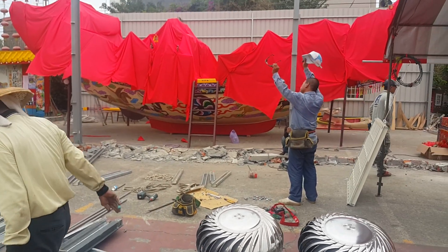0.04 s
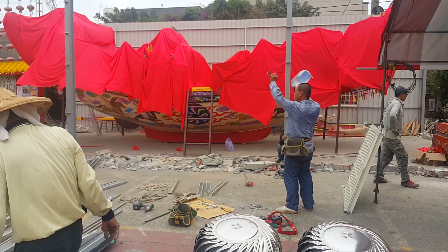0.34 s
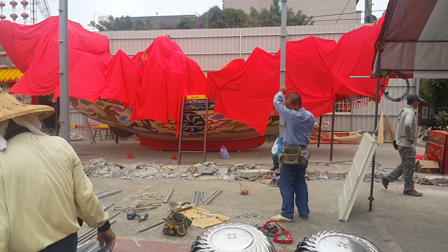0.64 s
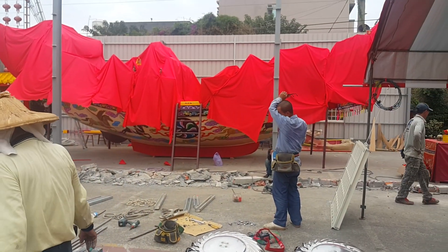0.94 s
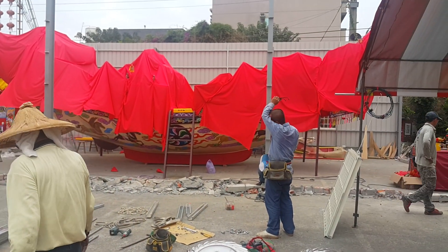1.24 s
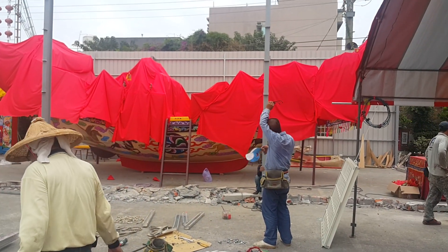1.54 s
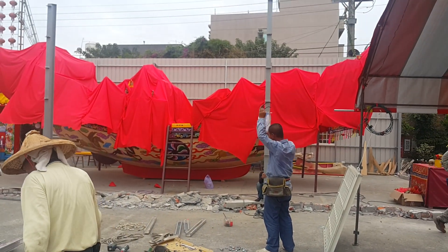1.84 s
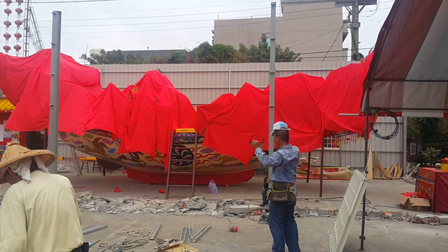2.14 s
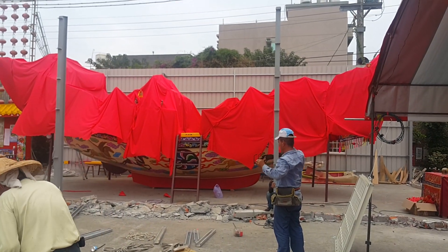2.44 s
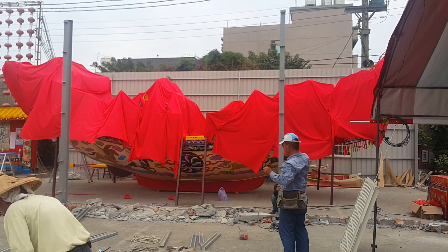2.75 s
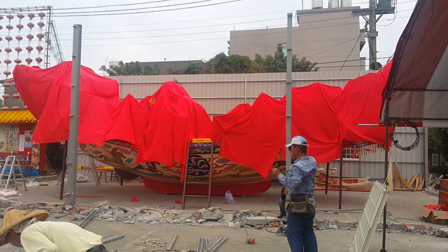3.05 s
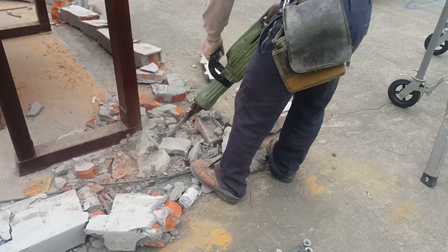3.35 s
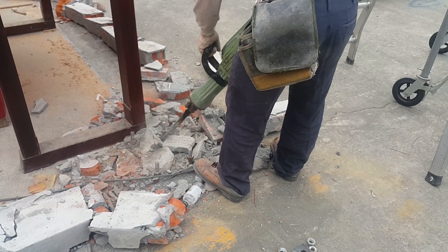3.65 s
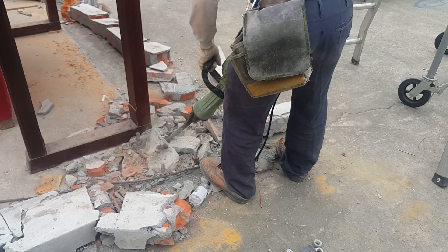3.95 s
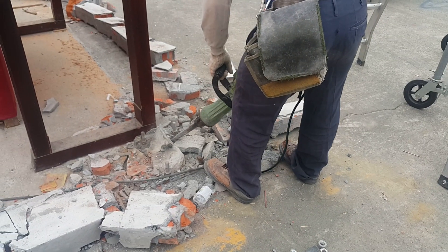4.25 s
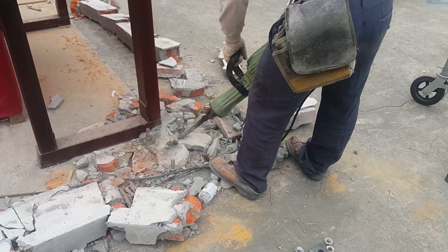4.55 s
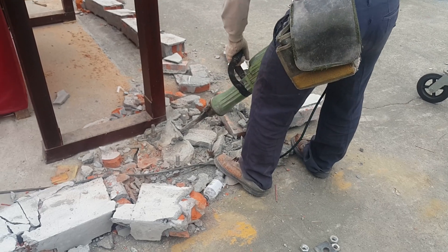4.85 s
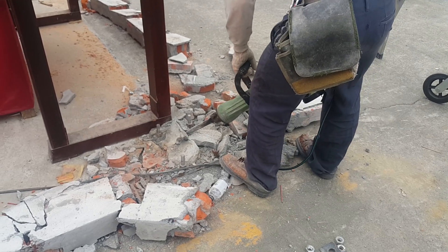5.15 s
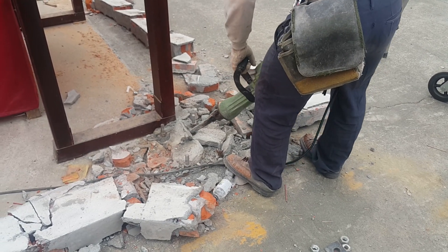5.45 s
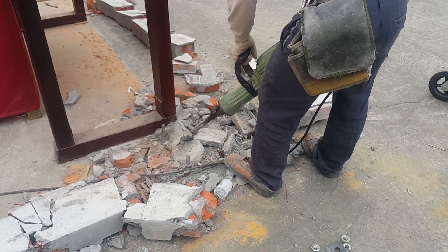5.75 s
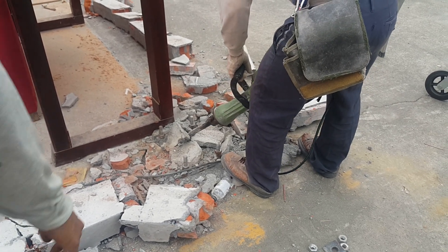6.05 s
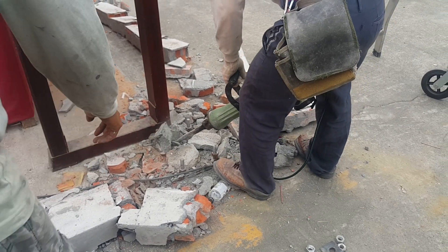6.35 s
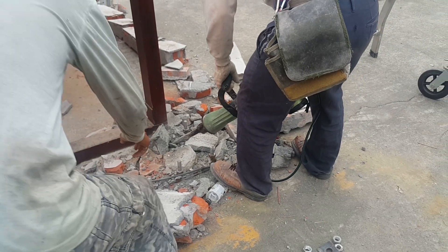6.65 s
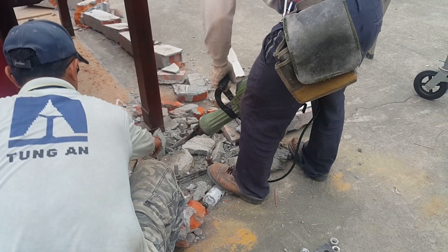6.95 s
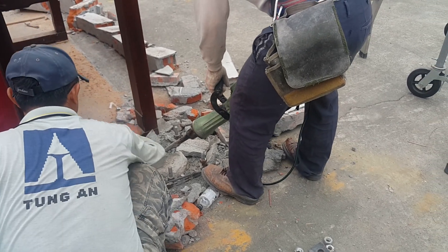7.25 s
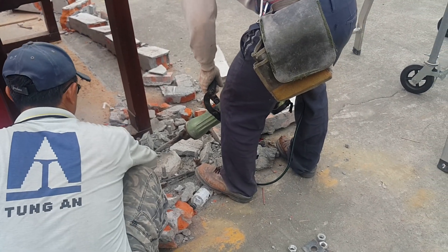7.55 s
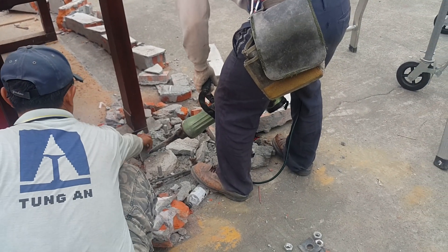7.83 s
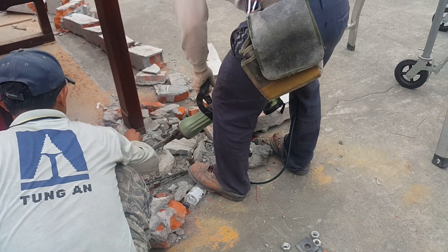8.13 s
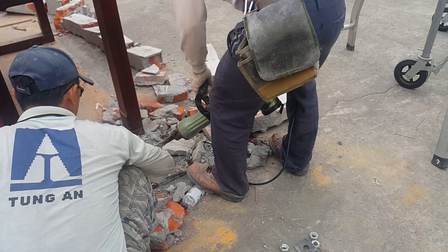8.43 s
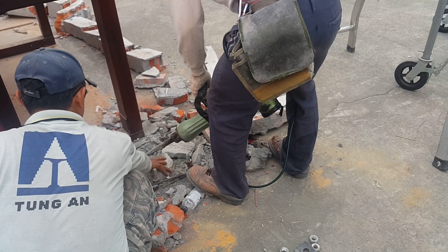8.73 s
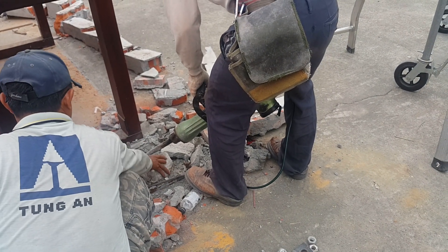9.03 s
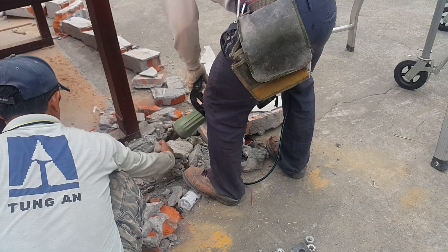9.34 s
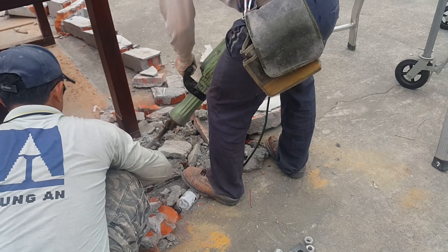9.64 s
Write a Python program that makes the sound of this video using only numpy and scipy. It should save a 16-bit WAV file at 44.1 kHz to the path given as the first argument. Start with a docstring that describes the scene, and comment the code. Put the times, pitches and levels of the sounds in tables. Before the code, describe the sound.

Heard first from across a walled yard, an electric hammer strikes masonry a few times, then rattles on rapidly. About a third of the way through, the microphone is right next to it. The motor whirrs up and coasts repeatedly, each blow cracking stone, ringing the chisel and scattering chips. Near the end the hammer winds down and a hand lightly shifts rubble, over quiet open air and a faint distant engine.

```python
"""Chipping hammer in a walled yard

An electric hammer breaks brick and concrete, heard from across the yard, then from beside it.
The trigger is feathered: the motor whirrs up, the blows quicken, then slow as it coasts.
Each blow cracks the stone and rings the steel chisel; close by it also thumps the ground and
throws chips. An engine idles far off. Near the end a hand shifts loose pieces."""
import sys
import numpy as np
from scipy import signal
from scipy.fft import rfft, irfft, next_fast_len
from scipy.io import wavfile

SR = 44100
rng = np.random.default_rng(int(sys.argv[2]) if len(sys.argv) > 2 else 0)


def store_wav(level_fs):
    """Save 16-bit WAV to argv[1]."""
    pcm = np.round(np.clip(np.atleast_2d(level_fs), -1, 1) * 32767)
    wavfile.write(sys.argv[1], SR, pcm.T.astype(np.int16))


N = 427329
TIME = np.arange(N) / SR
CHANGE_S = 3.343  # the scene changes from far to near
FAR = TIME < CHANGE_S
BLOW_SAMPLES = 8192
BLOW_TIME = np.arange(BLOW_SAMPLES) / SR


def from_db(db):
    """Decibels to gain."""
    return 10 ** (np.asarray(db) / 20)


def unit_rms(x):
    """Scale to an rms of 1."""
    return x / np.sqrt(np.mean(x ** 2) + 1e-20)


def at_hz(spectrum, hz):
    """Read a spectrum on a log-frequency axis."""
    freq_hz, level_db = np.transpose(spectrum)
    return np.interp(np.log(hz + 1), np.log(freq_hz), level_db)


def add(out, start_s, sound):
    """Mix a short sound in."""
    i = max(0, round(start_s * SR))
    out[:, i:i + sound.shape[-1]] += sound[..., :max(0, N - i)]


def colour(x, spectrum, tilt_db=0):
    """Minimum-phase filter; tilt raises the treble and lowers the middle."""
    size = next_fast_len(x.shape[-1] // 2 + 1) * 2
    hz = np.fft.rfftfreq(size, 1 / SR)
    level_db = at_hz(spectrum, hz) + tilt_db * at_hz([(1300, -1.03), (6000, 0.88)], hz)
    cepstrum = irfft(np.log(from_db(level_db)))[:size // 2]
    cepstrum[1:] *= 2
    return irfft(rfft(x, size) * np.exp(rfft(cepstrum, size)))[..., :x.shape[-1]]


def stereo_noise(shared, size):
    """White noise with a fraction of its power common to both ears."""
    noise = rng.standard_normal((3, size))
    return np.sqrt(shared) * noise[2] + np.sqrt(1 - shared) * noise[:2]


def drift(rate_hz):
    """Random wander, rms 1."""
    knots = rng.standard_normal(4000)
    return unit_rms(np.interp(TIME * rate_hz, np.arange(len(knots)), knots))


# open-air spectrum: freq_hz, level_db
AIR_SPECTRUM = [(25, -9.5), (60, -16), (150, 8.5), (400, 2.5), (650, 9), (1300, -5), (2300, -8),
                (5000, -15.5), (16000, -32)]

def air():
    """Low wash of open air, quieter beside the hammer."""
    level_db = np.where(FAR, -46, -52) + 0.12 * drift(3.1)
    return from_db(level_db) * unit_rms(colour(stereo_noise(0.93, N), AIR_SPECTRUM))


# engine harmonics: firing_multiple, far_level_db
ENGINE_HARMONICS = [(2, -62.5), (3, -63.5), (6, -62)]

def idling_engine(firing_hz=27):
    """Harmonics of a distant engine's wandering firing rate."""
    phase = 2 * np.pi * np.cumsum(firing_hz * (1 + 0.019 * drift(5.5))) / SR
    drone = sum(from_db(db + drift(14)) * np.sin(k * phase) for k, db in ENGINE_HARMONICS)
    return np.sqrt(2) * drone * from_db(np.where(FAR, 0, -10))


# trigger pulls: start_s, end_s, drive_noise_db
TRIGGER_PULLS = [(-0.6, 0.004, -26), (0.96, 1.55, -26), (1.544, 3.307, -30.5), (3.95, 4.386, -30),
                 (4.514, 4.765, -33), (5.24, 5.553, -33.5), (6.172, 6.56, -31.5), (6.815, 6.957, -29),
                 (7.638, 7.866, -31), (9.605, 9.7, -55)]

def motor_curves(spin_up_s=0.12, coast_s=0.6, switch_s=0.025):
    """Speed (dB re full) and whirr level (dB): the fan follows speed, brushes and gears the trigger."""
    t = np.arange(-SR, N, 100) / SR
    step_s = t[1] - t[0]
    drive = sum(from_db(db) * ((t >= on) & (t < off)) for on, off, db in TRIGGER_PULLS)
    speed = [1.0]
    for held in drive[1:] > 0:
        acceleration = (1 - speed[-1]) / spin_up_s if held else -speed[-1] / coast_s
        speed.append(speed[-1] + step_s * acceleration)
    speed_db = 20 * np.log10(speed)
    lag = np.exp(-step_s / switch_s)
    brushes = signal.lfilter([1 - lag], [1, -lag], drive)
    fan = from_db(-29 + 1.51 * speed_db)
    motor_db = 20 * np.log10(np.hypot(brushes, fan))
    return np.interp(TIME, t, speed_db), np.interp(TIME, t, motor_db)


def whirr(spectrum, motor_db, shared, flutter_db, grit_db):
    """Fan and brush noise with crank flutter and gear grit, duller as the motor slows."""
    roughness = from_db(flutter_db * drift(110) + grit_db * drift(400))
    full = unit_rms(colour(stereo_noise(shared, N) * roughness, spectrum))
    dull = signal.sosfiltfilt(signal.butter(2, 6000, fs=SR, output="sos"), full)
    brightness = np.clip(from_db(0.5 * (motor_db + 33.5)), 0, 1)
    return dull + brightness * (full - dull)


# far whirr spectrum: freq_hz, level_db
FAR_WHIRR_SPECTRUM = [(100, -18.5), (450, -10.5), (650, -3), (1150, -3), (1600, 1.5), (2350, -1),
                      (3100, -5.5), (4400, -4), (7300, -19), (8500, -25.5), (16000, -35)]

def far_motor(motor_db, din_db=-34.5):
    """Whirr from across the yard, sinking into the steady din of the site."""
    gain = np.hypot(from_db(motor_db - 0.8), from_db(din_db))
    return FAR * gain * whirr(FAR_WHIRR_SPECTRUM, motor_db, shared=0.62, flutter_db=1.5, grit_db=1.5)


# single blows, trigger feathered: start_s, crack_db, ring_db
SINGLE_BLOWS = [(0.0474, -17, -25.5), (0.1255, -18.5, -28.5), (0.221, -18.5, -29), (0.66, -25.5, -46),
                (0.773, -25, -43), (0.9467, -22.5, -42), (1.0264, -18.5, -31.5), (1.089, -17.5, -31),
                (3.3476, -15, -20), (3.438, -15.5, -25.5), (3.5466, -14, -26), (3.599, -29, -48),
                (3.6598, -31, -63), (3.9098, -27.5, -39.5), (3.9756, -23.5, -29.5), (4.054, -15.5, -27),
                (4.116, -18, -24.5), (4.1709, -14, -25.5), (4.2233, -16, -23.5), (4.2746, -16, -22.5),
                (4.3256, -12, -30.5), (4.3776, -15, -24.5), (4.435, -13.5, -28), (4.503, -14.5, -26),
                (4.5762, -12.5, -27), (4.641, -14, -22.5), (4.702, -12.5, -24.5), (4.7492, -13.5, -25.5),
                (4.8093, -16, -39), (4.8774, -15.5, -17.5), (4.902, -27.5, -21), (4.9467, -17.5, -48),
                (5.0287, -23.5, -24.5), (5.1169, -19, -28), (5.2249, -22, -28), (5.3071, -17.5, -25),
                (5.3682, -18, -21), (5.4231, -15.5, -23), (5.476, -13, -46), (5.5308, -14, -27.5),
                (5.597, -13.5, -27), (5.6723, -15, -35), (5.7583, -22, -50), (5.861, -25, -41),
                (5.9718, -31, -46), (6.0902, -21.5, -42), (6.21, -23, -31.5), (6.2969, -18.5, -24.5),
                (6.3592, -18.5, -20.5), (6.4138, -15.5, -21.5), (6.468, -16, -19), (6.5188, -15.5, -19.5),
                (6.5695, -15.5, -25), (6.6248, -15, -27.5), (6.6863, -18, -24.5), (6.759, -15.5, -28.5),
                (6.8368, -16.5, -34), (6.902, -16, -22), (6.957, -15, -21.5), (7.0149, -13, -31),
                (7.0848, -17, -48), (7.1549, -18.5, -22), (7.2355, -14.5, -22), (7.3343, -17.5, -24.5),
                (7.4533, -19.5, -31.5), (7.6, -19.5, -36), (7.7241, -18, -25), (7.794, -14.5, -30),
                (7.8597, -16, -20.5), (7.9322, -14, -21.5), (8.0237, -17.5, -24.5), (8.1268, -18, -25),
                (8.256, -20.5, -28.5), (8.4132, -23, -39), (8.6107, -26.5, -47), (8.8556, -27.5, -57),
                (9.1752, -30.5, -61), (9.674, -33, -65)]
# stretches of even blows, trigger held: start_s, blow_count, crack_db, ring_db
RUN_STRETCHES = [(1.142, 2, -18, -28), (1.2431, 4, -15, -28.5), (1.425, 6, -15, -28), (1.6881, 2, -16, -31),
                 (1.7916, 4, -16.5, -30), (1.979, 6, -17.2, -30.5), (2.248, 7, -18.5, -31.5),
                 (2.5522, 5, -20, -33.5), (2.7605, 2, -19, -39), (2.857, 3, -20, -41.5),
                 (3.0129, 3, -20, -41), (3.151, 4, -19.5, -39.5), (3.32, 1, -18, -39)]

def all_blows(crack_spread_db=0.7, ring_spread_db=2):
    """Every blow as a row of start_s, crack_db, ring_db."""
    start_s, count, crack_db, ring_db = np.transpose(RUN_STRETCHES)
    first_blow = np.cumsum(count) - count
    number = np.arange(first_blow[-1] + 1)
    stretch = np.searchsorted(first_blow, number, side="right") - 1
    scatter_db = rng.standard_normal((len(number), 2)) * [crack_spread_db, ring_spread_db]
    levels_db = np.column_stack([crack_db, ring_db])[stretch] + scatter_db
    run = np.column_stack([np.interp(number, first_blow, start_s), levels_db])
    return np.vstack([SINGLE_BLOWS, run])


def burst(spectrum, tilt_db, rise_s, decay_s, shared, grain_db, uneven_db):
    """Dying swarm of tiny fractures, coloured anew each time; energy of 12 ms at 0 dB."""
    grains = from_db(grain_db * np.repeat(rng.standard_normal(BLOW_SAMPLES // 32), 32))
    envelope = (1 - np.exp(-(BLOW_TIME / rise_s) ** 2)) * np.exp(-BLOW_TIME / decay_s)
    swarm = stereo_noise(shared, BLOW_SAMPLES) * grains * envelope
    hz = np.geomspace(100, 16000, 40)
    level_db = at_hz(spectrum, hz) + uneven_db * rng.standard_normal(len(hz))
    coloured = colour(swarm, np.transpose([hz, level_db]), tilt_db)
    return unit_rms(coloured) * np.sqrt(0.012 * SR / BLOW_SAMPLES)


def ring(modes, spread_db, detune, rise_s):
    """Struck modes; strength and pitch vary with the tip's seating, phase with the ear."""
    hz, level_db, t60_s = np.transpose(modes)[:, :, None]
    strength, stretch = rng.uniform(-1, 1, (2, len(modes), 1))
    phase = 2 * np.pi * hz * (1 + detune * stretch) * BLOW_TIME
    fade = from_db(level_db + spread_db * strength - 60 * BLOW_TIME / t60_s)
    ears = np.exp(2j * np.pi * (rng.random(len(modes)) + rng.random((2, len(modes))) / 2))
    tones = ears.real @ (fade * np.sin(phase)) + ears.imag @ (fade * np.cos(phase))
    return tones * (1 - np.exp(-BLOW_TIME / rise_s))


# far stone crack spectrum: freq_hz, level_db
FAR_CRACK_SPECTRUM = [(150, -22), (450, -20.5), (660, 3.5), (1100, -6), (1500, 3.5), (2700, -0.5),
                      (4000, 0), (5600, 0.5), (7400, 0), (8500, -18.5), (12000, -14), (16000, -25)]
# damped modes of barrel and slab: pitch_hz, level_db, t60_s
BODY_MODES = [(649, -7.5, 0.065), (858, -4.5, 0.036), (1455, -1, 0.056), (1711, -6.5, 0.053),
              (2314, 0.5, 0.032), (2590, 5.5, 0.023), (2712, 4, 0.041)]
# tool rattling in its holder: freq_hz, level_db
RATTLE_SPECTRUM = [(300, -15), (900, -10), (2500, -6.5), (3700, 6), (4900, -4.5), (5700, 12), (6400, -7),
                   (7500, 18.5), (8400, -8), (11500, -7), (12700, -11.5), (16000, -30.5)]
# chisel modes, first four bending: pitch_hz, level_db, t60_s
CHISEL_MODES = [(2477, -10.5, 0.1), (3590, -5, .11), (4700, -15.5, 0.17), (5500, -5.5, 0.1),
                (6900, -3, .11), (7050, -9.5, 0.095), (7380, 0, 0.1), (7735, -4, 0.09), (10260, -6, 0.085),
                (12620, -13, 0.15), (14690, -8, 0.08)]

def far_hammer(blows):
    """Blows from across the yard: little bass, strong barrel modes, the steel's top dulled."""
    out, steel = np.zeros((2, 2, N))
    for start_s, crack_db, ring_db in blows:
        bright_db = 0.3 * (ring_db + 28.5)  # hard stone: more ring, brighter crack
        crack = burst(FAR_CRACK_SPECTRUM, bright_db, rise_s=0.00049, decay_s=0.0066,
                      shared=0.34, grain_db=0.5, uneven_db=2)
        knock = ring(BODY_MODES, spread_db=1, detune=0.021, rise_s=0.0005)
        rattle = burst(RATTLE_SPECTRUM, tilt_db=0, rise_s=0.0021, decay_s=0.027,
                       shared=0.093, grain_db=5, uneven_db=5)
        chisel = ring(CHISEL_MODES, spread_db=3, detune=0.002, rise_s=0.002)
        add(out, start_s, from_db(crack_db) * crack + from_db(crack_db - 3) * knock)
        add(out, start_s, from_db(ring_db + 7) * rattle)
        add(steel, start_s, from_db(ring_db) * chisel)
    return out + colour(steel, [(5500, 6.5), (7400, 3.5), (10000, -11), (12600, 3), (14700, -4)])


# shaft clanks: start_s, level_db
SHAFT_CLANKS = [(0.048, -15), (0.127, -12.5), (0.222, -16), (4.879, -20), (4.903, -14.5), (7.085, -17),
                (7.862, -33)]

def clanks():
    """The tip skids free and the shaft's bending modes ring out."""
    out = np.zeros((2, N))
    for start_s, level_db in SHAFT_CLANKS:
        shaft = ring(CHISEL_MODES[:4], spread_db=2, detune=0.003, rise_s=0.002)
        add(out, start_s, from_db(level_db) * shaft)
    return out


# dull scuffs: peak_s, width_s, centre_hz, level_db
DULL_SCUFFS = [(1.339, 0.052, 300, -36), (2.32, 0.1, 230, -40.5), (6.23, .05, 500, -41.5)]

def scuffs():
    """Brief swells of low rubbing noise."""
    out = np.zeros((2, N))
    t = np.arange(SR // 2) / SR - 0.25
    for peak_s, width_s, hz, level_db in DULL_SCUFFS:
        band = [(hz / 4, -25), (hz * 0.75, 0), (hz * 1.56, 0), (hz * 4, -35), (hz * 20, -60)]
        rub = unit_rms(colour(stereo_noise(0.95, len(t)), band))
        add(out, peak_s + t[0], from_db(level_db) * rub * np.exp(-(t / width_s) ** 2 / 2))
    return out


# near whirr spectrum: freq_hz, level_db
NEAR_WHIRR_SPECTRUM = [(100, -35), (400, -12), (650, -1.5), (1850, -2.5), (2150, 4.5), (2450, 0),
                       (3000, -8.5), (4000, -1), (5000, -14.5), (7400, -11.5), (8500, -20.5), (16000, -33)]
# motor housing resonance: freq_hz, level_db
HOUSING_SPECTRUM = [(170, -40), (242, -17), (257, 0), (273, -17), (420, -40), (3000, -75)]

def near_motor(motor_db, speed_db, din_db=-51.5):
    """Close whirr over a sheltered din; the housing's hum rises steeply with speed."""
    housing = unit_rms(colour(stereo_noise(0.82, N), HOUSING_SPECTRUM))
    fan = whirr(NEAR_WHIRR_SPECTRUM, motor_db, shared=0.65, flutter_db=2.5, grit_db=2.5)
    gain = np.hypot(from_db(motor_db - 1), from_db(din_db))
    return ~FAR * (gain * fan + from_db(-44 + 3.8 * speed_db) * housing)


def thump(typical_hz, decay_s, sag_s, ear_spread_rad):
    """The slab gives for a cycle or two, its pitch sagging."""
    start_hz = typical_hz * np.exp(0.2 * rng.standard_normal())
    pitch_hz = start_hz * (1 + np.exp(-BLOW_TIME / sag_s)) / 2
    phase = 2 * np.pi * np.cumsum(pitch_hz) / SR + ear_spread_rad * rng.standard_normal((2, 1))
    slab = np.sin(phase) * BLOW_TIME / decay_s * np.exp(1 - BLOW_TIME / decay_s)
    return signal.sosfilt(signal.butter(2, 85, "high", fs=SR, output="sos"), slab)


# near stone crack spectrum: freq_hz, level_db
NEAR_CRACK_SPECTRUM = [(100, -23), (300, -6.5), (700, -4.5), (1500, -3.5), (2700, -2), (4800, -0.5),
                       (5700, -1.5), (6400, -1.5), (7400, -4.5), (8400, -8.5), (11000, -14.5),
                       (16000, -19.5)]

def near_hammer(blows, full_blow_db=-14.5, free_ring_db=-25):
    """Close blows: stone cracks, barrel knocks, tool rattles, chisel rings, ground thumps."""
    out = np.zeros((2, N))
    for start_s, crack_db, ring_db in blows:
        force_db = crack_db - full_blow_db  # weak blows crack duller and thump far less
        bright_db = 0.53 + 0.06 * force_db + rng.normal(0, 1.18)
        bright_db -= 0.51 * max(ring_db - free_ring_db, 0)  # a freely ringing tip cracks duller
        thump_db = -27 + 2.5 * force_db + rng.normal(0, 2)
        crack = burst(NEAR_CRACK_SPECTRUM, bright_db, rise_s=0.002, decay_s=0.0037,
                      shared=0.46, grain_db=0, uneven_db=3.5)
        knock = ring(BODY_MODES, spread_db=7.5, detune=0.045, rise_s=0.00037)
        rattle = burst(RATTLE_SPECTRUM, tilt_db=-1, rise_s=0.0038, decay_s=0.014,
                       shared=0.23, grain_db=2, uneven_db=3.5)
        chisel = ring(CHISEL_MODES, spread_db=9, detune=0.005, rise_s=0.0011)
        ground = thump(typical_hz=219, decay_s=0.0019, sag_s=0.004, ear_spread_rad=1.15)
        add(out, start_s, from_db(crack_db + 1.5) * crack)
        add(out, start_s, from_db(crack_db - 8 - bright_db / 2) * knock)
        add(out, start_s, from_db(ring_db + 5.5) * rattle + from_db(ring_db + 3) * chisel)
        add(out, start_s + 0.0014, from_db(thump_db) * ground)
    return out


def chip():
    """One piece of stone ticks against another."""
    return burst(NEAR_WHIRR_SPECTRUM, tilt_db=-3.5, rise_s=0.00037, decay_s=0.0037,
                 shared=0.64, grain_db=2, uneven_db=6.5)


def rubble(blows, below_db=20, spread_db=0.5, scatter_s=0.13, chips_per_blow=2):
    """Each blow throws up chips that tick down on the ground."""
    out = np.zeros((2, N))
    for start_s, crack_db, _ in blows:
        for softness, flight in rng.random((chips_per_blow, 2)):
            landing_s = start_s + 0.025 + scatter_s * flight
            add(out, landing_s, from_db(crack_db - below_db - spread_db * softness) * chip())
    return out


# slab thuds: start_s, level_db
SLAB_THUDS = [(3.548, -24), (4.326, -20), (4.642, -23), (4.878, -14.5), (5.119, -15.5), (5.675, -18),
              (6.414, -17), (6.572, -9), (7.236, -23), (7.795, -19), (8.128, -22)]

def thuds():
    """A slab gives way under the chisel and drops on its bed."""
    out = np.zeros((2, N))
    for start_s, level_db in SLAB_THUDS:
        slab = thump(typical_hz=210, decay_s=0.00087, sag_s=0.0038, ear_spread_rad=1)
        add(out, start_s, from_db(level_db) * slab)
    return out


# low hum contour: time_s, pitch_hz, level_db
HUM_CONTOUR = [(8.5, 127.4, -86), (8.62, 125.4, -53), (8.8, 119.3, -61), (9.05, 124.5, -61),
               (9.3, 116, -88)]

def low_hum():
    """A brief low tone that sags and fades."""
    time_s, pitch_hz, level_db = np.transpose(HUM_CONTOUR)
    phase = 2 * np.pi * np.cumsum(np.interp(TIME, time_s, pitch_hz)) / SR
    gain = from_db(np.interp(TIME, time_s, level_db) + 1.5 * drift(15))
    return np.sqrt(2) * gain * np.sin(phase)


def sorting(start_s=8.9, span_s=2.1, loudest_db=-40, spread_db=12):
    """A hand shifts loose pieces: soft random ticks, cut off where the scene ends."""
    out = np.zeros((2, N))
    for softness, when in rng.random((10, 2)):
        add(out, start_s + when * span_s, from_db(loudest_db - spread_db * softness) * chip())
    return out


# wall echoes: delay_s, level_db
WALL_ECHOES = [(0.0114, -18), (.045, -31.5), (0.087, -27)]

def yard_echoes(x, tail_db=-15, t60_s=0.34):
    """Wall reflections, different at each ear, and a thin tail; both lose bass and top."""
    t = np.arange(SR) / SR
    tail = stereo_noise(0, SR) * from_db(-60 * t / t60_s) * (1 - np.exp(-t / 0.008))
    response = from_db(tail_db) * unit_rms(tail) / np.sqrt(SR)
    for delay_s, level_db in WALL_ECHOES:
        taps = (delay_s * SR * rng.uniform(0.96, 1.04, 2)).astype(int)
        response[[0, 1], taps] += from_db(level_db)
    response = colour(response, [(150, -17.5), (600, 1.5), (3000, 4.5), (9000, -6.5)])
    return signal.fftconvolve(x, response, axes=1)[:, :N]


def place(x, balance, left_lead_ms):
    """Direction from level and time differences between the ears."""
    size = next_fast_len(N + 1000)
    hz = np.fft.rfftfreq(size, 1 / SR)
    side = np.array([[0.5], [-0.5]])
    shift = np.exp(2j * np.pi * hz * side * left_lead_ms / 1000)
    return irfft(rfft(x, size) * from_db(side * at_hz(balance, hz)) * shift, size)[:, :N]


# far hammer direction: freq_hz, left_minus_right_db
FAR_PAN = [(900, 2.5), (1500, 5.5), (2300, 8), (5600, -2), (9000, -6), (12000, 6)]
# near hammer direction: freq_hz, left_minus_right_db
NEAR_PAN = [(2600, 3.5), (4200, -1.5), (5600, -1), (7000, 0), (8400, 0.5)]

def scene():
    """The hammer, far then near, echoing in the yard over a quiet background."""
    blows = all_blows()
    far_blows, near_blows = blows[blows[:, 0] < CHANGE_S], blows[blows[:, 0] >= CHANGE_S]
    speed_db, motor_db = motor_curves()
    far = far_motor(motor_db) + far_hammer(far_blows)
    near = near_motor(motor_db, speed_db) + near_hammer(near_blows)
    work = place(far, FAR_PAN, left_lead_ms=-0.327) + place(near, NEAR_PAN, left_lead_ms=0.068)
    work += clanks() + rubble(near_blows) + thuds() + sorting()
    return work + yard_echoes(work) + air() + idling_engine() + scuffs() + low_hum()


def record(dry):
    """Soft-clip the peaks, then low-pass at 15.9 kHz."""
    rounded = 1.213 * np.tanh(dry / 1.374)
    return signal.sosfilt(signal.ellip(10, 0.2, 100, 15900, fs=SR, output="sos"), rounded)


dry = scene()
out = record(dry)
store_wav(out)
```